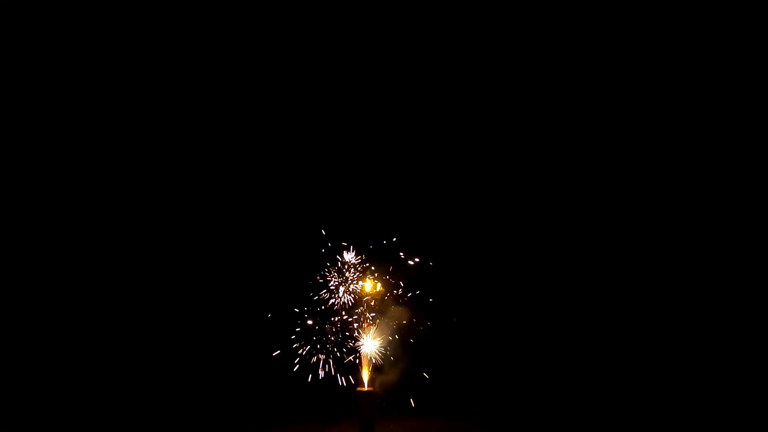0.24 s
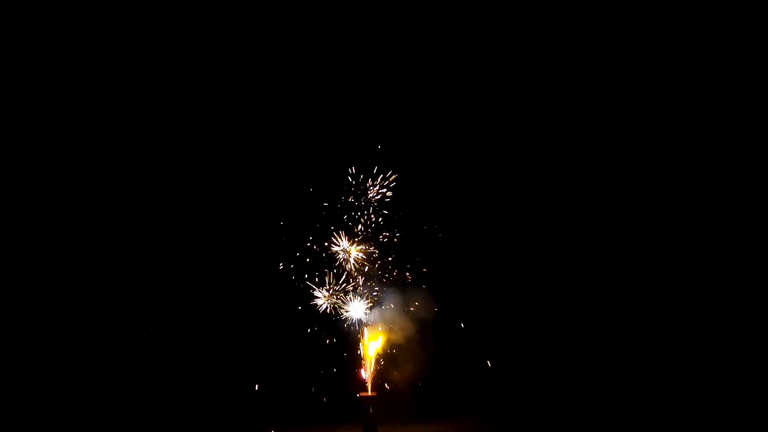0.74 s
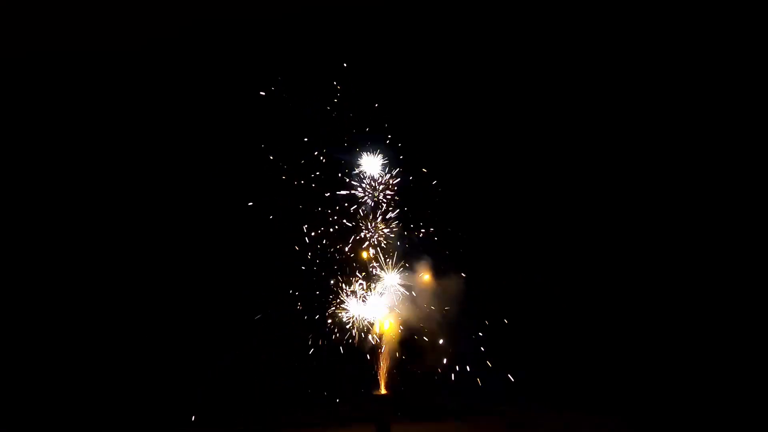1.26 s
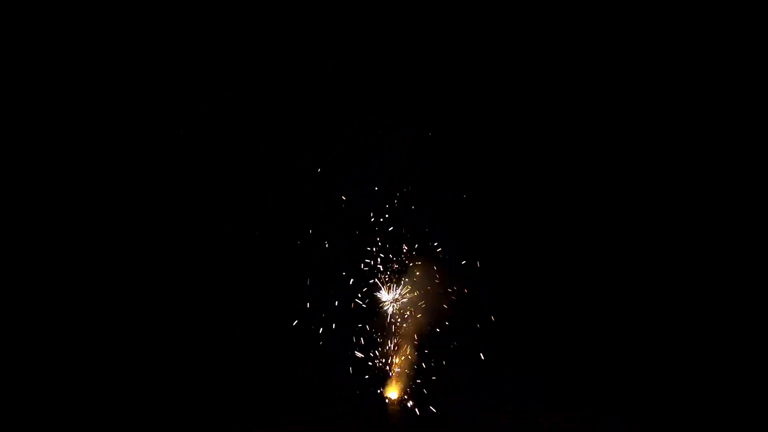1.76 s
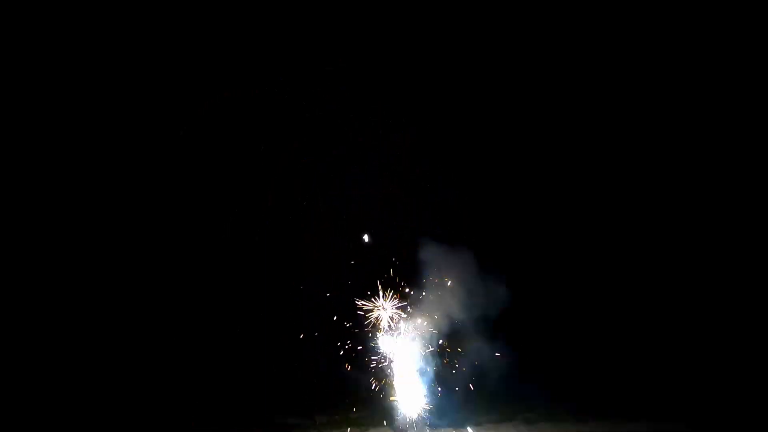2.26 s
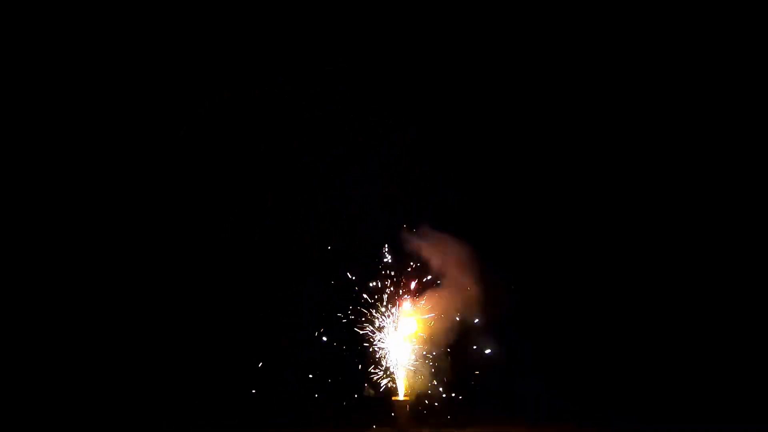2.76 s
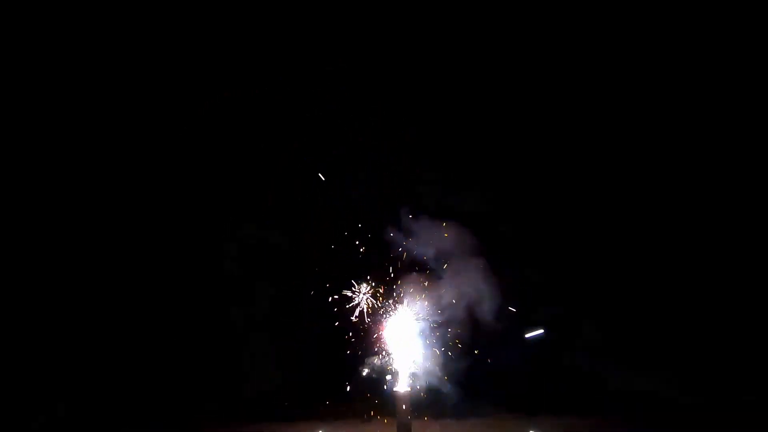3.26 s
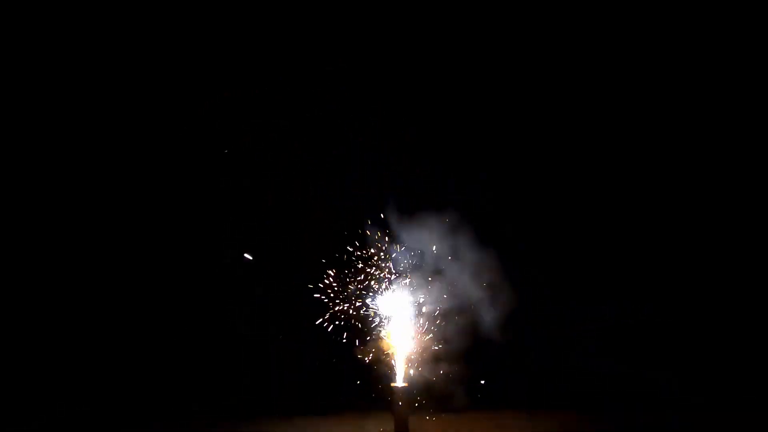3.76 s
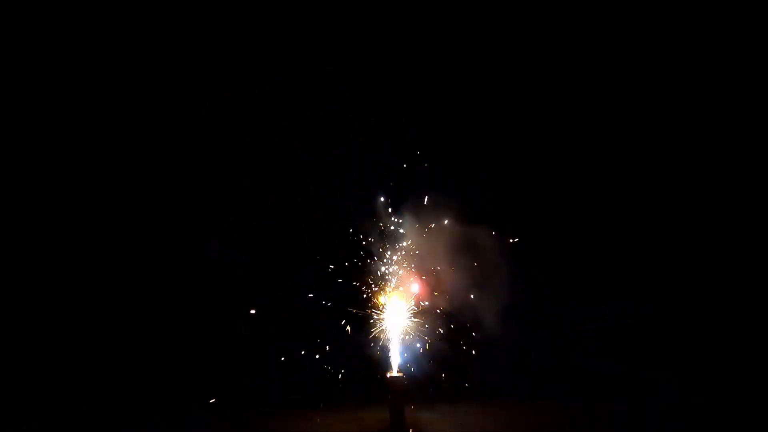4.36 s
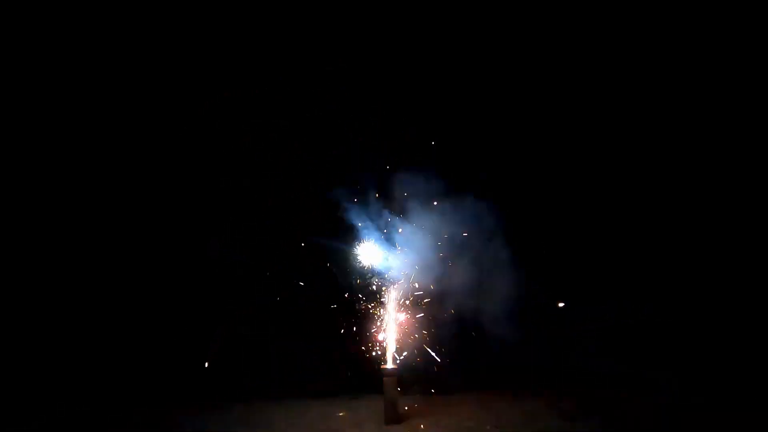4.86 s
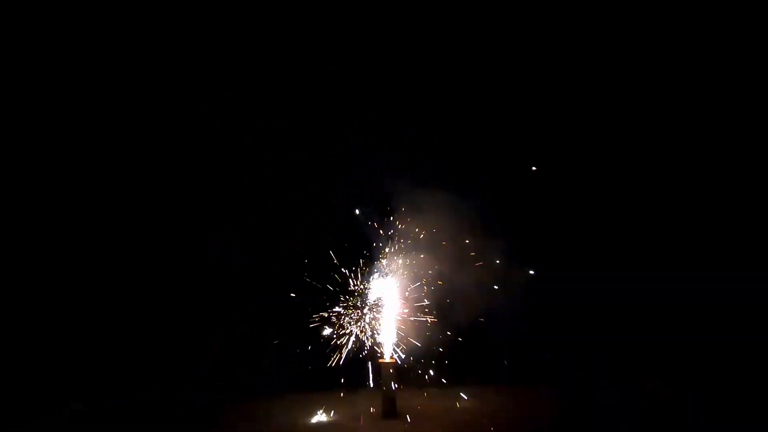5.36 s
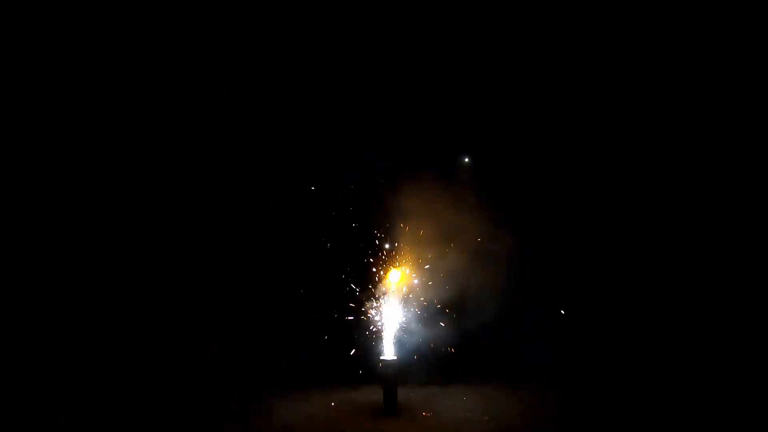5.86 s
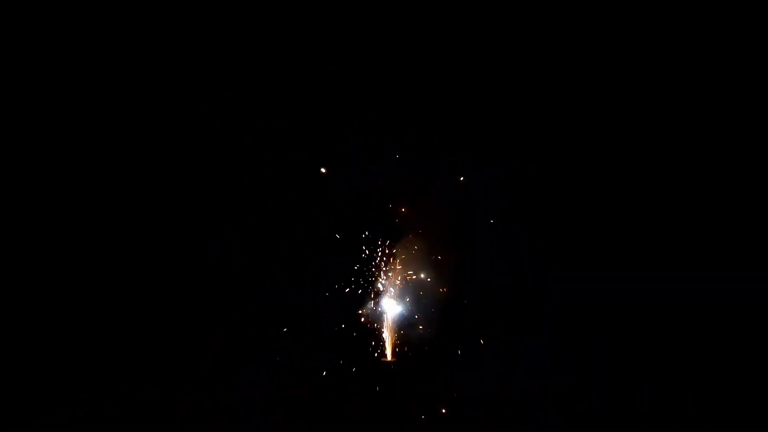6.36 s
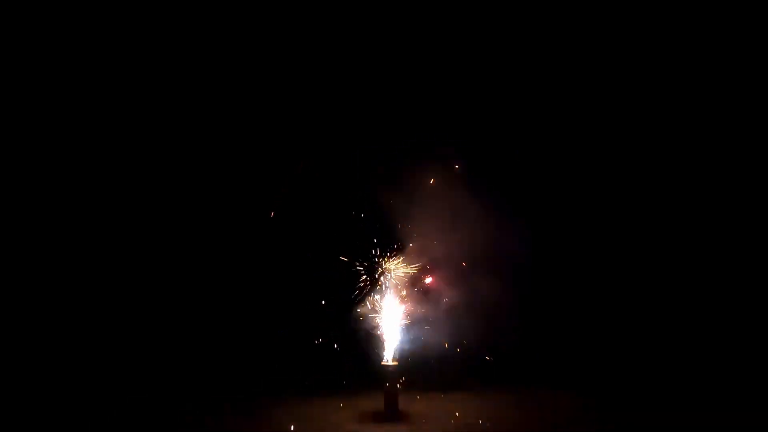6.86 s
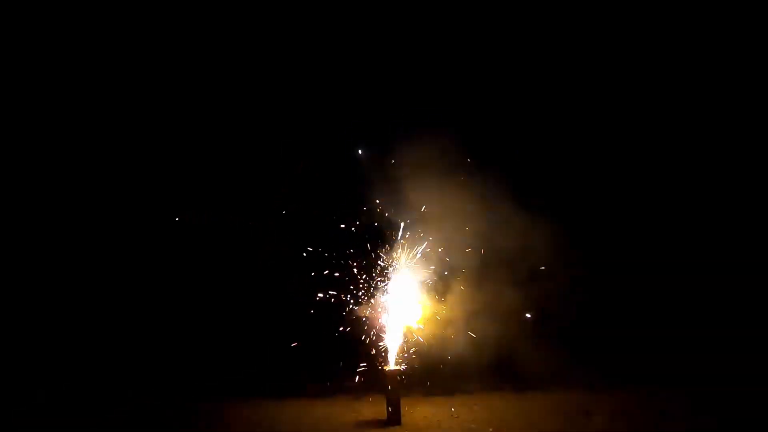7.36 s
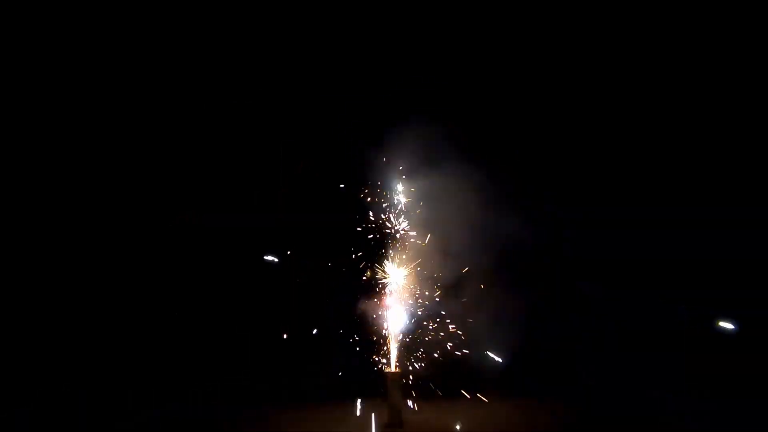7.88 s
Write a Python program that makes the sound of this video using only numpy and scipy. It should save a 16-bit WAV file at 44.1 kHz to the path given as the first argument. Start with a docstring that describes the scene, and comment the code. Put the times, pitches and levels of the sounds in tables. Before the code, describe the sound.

A ground fountain firework is already burning outdoors, a few metres from a small stereo microphone. Throughout, a grainy, fluttering gas hiss and quieter low rumble lie beneath fine spark crackle. From 0 to 2 seconds, sharp pops come in a crowded, irregular stream, many scattering brief sprays of tiny snaps; the fizz swells around 1.4. From about 2.2, stronger cracks with deep thumps are spaced wider, notably near 2.3, 2.8, 3.3, 3.4 and 4.6. Dull hollow tube knocks appear around 2.6, 4.2, 4.7, faintly at 5.8, and 6.9. A tight run of heavy pops fills 5.1 to 5.6, then the jet dips briefly near 5.9. Hard bangs follow around 6.1, 6.8, 7.0, 7.35 and 7.8, with the strongest at 7.95. Each has a millisecond-close ground slap, not a long reverberation; peaks clip and the level ducks briefly. The jet is still burning at the end.

```python
"""A ground fountain firework burns outdoors, a few metres from a small two-port microphone.
From the start its jet fizzes (shaped noise) and rumbles (band noise) under crowded sharp pops: pressure
clicks with a ground echo, a resonant thump and often a spray of spark clicks. Sputters add further sprays.
After about two seconds many pops are stronger and spaced wider; a few also ring the tube with a dull knock.
The last pop is the strongest. Gain control ducks after loud pops, and the highest peaks clip."""
import sys
import numpy as np
from scipy import signal
from scipy.fft import rfft, irfft, next_fast_len
from scipy.io import wavfile

SR = 44100
rng = np.random.default_rng(int(sys.argv[2]) if len(sys.argv) > 2 else 0)


def generate_wav(signal):
    """Clip the signal to [-1, 1] and save it as 16-bit WAV at the path in sys.argv[1]."""
    frames = np.transpose(np.atleast_2d(signal))
    scaled = np.clip(frames, -1, 1) * 32767
    pcm = np.round(scaled).astype(np.int16)
    wavfile.write(sys.argv[1], SR, pcm)


N = 358091


def amp(db):
    """Decibel law: converts a level in dB to a pressure gain."""
    return 10 ** (np.asarray(db) / 20)


def rms_one(x):
    """Normalisation: scales a signal to an rms of 1."""
    return x / np.sqrt(np.mean(x ** 2) + 1e-20)


def one_pole(x, tau_s):
    """Exponential relaxation: a low-pass whose impulse response has unit area."""
    r = np.exp(-1 / (tau_s * SR))
    return signal.lfilter([1 - r], [1, -r], x + 1e-18)


def drift(rate_hz):
    """Random fluctuation: white noise smoothed twice below a rate, with rms 1."""
    tau_s = 1 / (2 * np.pi * rate_hz)
    noise = rng.standard_normal(N + SR)
    smooth = one_pole(one_pole(noise, tau_s), tau_s)
    return rms_one(smooth[SR:])     # the first second lets the filters settle


def colour(x, hz, db):
    """Zero-phase filtering: shapes the spectrum along a curve over log frequency."""
    size = next_fast_len(N + 4096)
    f = np.maximum(np.fft.rfftfreq(size, 1 / SR), 1)
    gain = amp(np.interp(np.log(f), np.log(hz), db))
    return irfft(rfft(x, size) * gain, size)[:N]


def swing(push, ring_hz, width_hz):
    """Damped resonance: a push sets a mode ringing, and a wider mode dies sooner."""
    r, w = np.exp(-np.pi * width_hz / SR), 2 * np.pi * ring_hz / SR
    return signal.lfilter([1, 0, -1], [1, -2 * r * np.cos(w), r * r], push + 1e-18)


# strength of the jet: (time [s], base fizz level [dB])
JET = [(0, -38), (.6, -37), (0.999, -38.5), (1.43, -34.5), (1.62, -39), (2.12, -40), (2.44, -41),
       (2.56, -40), (2.83, -39), (3.47, -41.5), (3.62, -41), (3.8, -40), (4.62, -40.5), (4.78, -39),
       (5.4, -40.5), (5.72, -39), (5.88, -46), (6.15, -38.5), (6.32, -39.5), (6.4, -41), (6.7, -43),
       (6.9, -38), (7.15, -41.5), (8.12, -38.5)]


def jet_level():
    """Source strength: the level of the jet moves linearly in dB between its points."""
    s, fizz = np.transpose(JET)
    return np.interp(np.arange(N) / SR, s, fizz)


RUMBLE_DB = -8.5        # base level of the roar against the fizz
RUMBLE_FOLLOWS = 0.83   # share of the jet's swing in dB


def rumble(fizz_db):
    """Combustion noise: the low roar of the burning charge is band noise that flutters in level."""
    mean_db = fizz_db.mean()
    rumble_db = mean_db + RUMBLE_FOLLOWS * (fizz_db - mean_db) + RUMBLE_DB
    band = signal.butter(3, [50.0, 230.0], "band", fs=SR, output="sos")
    shared = signal.sosfilt(band, rng.standard_normal(N))
    own = signal.sosfilt(band, rng.standard_normal(N))
    roar = rms_one(shared + 0.09 * own * [[1], [-1]])    # nearly the same in both ports
    return roar * amp(rumble_db + 3.1 * drift(46.0))


TREBLE_FOLLOWS = 1               # share of the jet's swing in dB
SURGE_HZ, SURGE_DB = 4400, 3.5   # the gas sputters mostly below this pitch; scale of its level swings
# spectrum of the gas hiss before scaling: (frequency [Hz], relative level [dB])
HISS = [(300, -33), (478, -10), (801, -2), (1930, 3), (3830, 1.5), (8790, 1.5), (14000, -28), (16000, -42)]


def hiss(fizz_db):
    """Turbulent jet noise: gas rushing from the nozzle, scattered back unrelated in the two ports."""
    hz, db = np.transpose(HISS)
    noise = [rms_one(colour(rng.standard_normal(N), hz, db)) for _ in range(2)]
    low = signal.sosfilt(signal.butter(2, SURGE_HZ, fs=SR, output="sos"), noise)
    treble = noise - low
    calm_db = fizz_db.mean() + TREBLE_FOLLOWS * (fizz_db - fizz_db.mean())
    flutter = drift(34.0) + 0.46 * drift(8.2)
    return amp(fizz_db + SURGE_DB * flutter) * low + amp(calm_db) * treble


TUBE_HZ, TUBE_WIDTH_HZ = 700, 110
# dull bursts inside the tube: (time [s], push level before the port offsets [dB])
KNOCKS = [(2.622, -20), (4.194, -20), (4.7052, -23), (5.8256, -30.5), (6.9183, -23.5)]


def knocks():
    """Tube resonance: a dull burst at the nozzle sets the tube ringing briefly."""
    s, db = np.transpose(KNOCKS)
    push = np.bincount(np.round(s * SR).astype(int), amp(db), N)
    return -swing(push, TUBE_HZ, TUBE_WIDTH_HZ) * amp([[-2.0], [1.5]])


ECHO_FADES_FROM_MS, ECHO_LOSS_DB = 1.79, 2   # later echoes weaken by this many dB per ms
# ground echo, the right port facing the ground: (left level [dB], right level [dB])
GROUND_DB = (0, 3.5)
# dull echo off a surface near the microphone: (delay [ms], left level [dB], right level [dB])
NEAR_ECHO = (1.629, -13, -9)


def with_ground(at, size, echo_ms, open_air=1):
    """Image source: each pressure click reaches both ports directly, off the ground and off a near surface."""
    late = np.minimum(at + np.round(echo_ms * SR / 1000).astype(int), N - 1)
    direct = np.bincount(at, size, N)
    # high bursts meet the ground steeply and come back weaker and duller
    steep = np.clip(echo_ms - ECHO_FADES_FROM_MS, 0, 1)
    loss_db = ECHO_LOSS_DB * np.maximum(echo_ms - ECHO_FADES_FROM_MS, 0)
    back = open_air * size * amp(-loss_db)
    echo = one_pole(np.bincount(late, back * (1 - steep), N), .00004)
    echo = echo + one_pole(np.bincount(late, back * steep, N), .00008)
    near_ms, *near_db = NEAR_ECHO
    dull = one_pole(direct, 0.000059)
    near = np.interp(np.arange(N) - near_ms * SR / 1000, np.arange(N), dull, left=0)
    return -(direct + echo * amp(GROUND_DB)[:, None] + near * amp(near_db)[:, None])


JET_SPARKS_DB = -7.5                      # base level of the jet's sparks against its fizz
SNAP_GAIN, CROSSOVER_HZ = 1.253, 377      # gain of sparks against star fronts; their low cut
MID_SNAPS_PER_S, MID_SNAP_DB = 27, 11     # occasional louder sparks: click size before the spark level
# puffs of sparks without a loud crack: (time [s], spray level before the spark and port gains [dB])
SPUTTERS = [(0.125, -29.5), (0.1579, -33.5), (0.332, -31.5), (0.3624, -35.5), (0.393, -34), (0.4054, -44),
            (0.43, -31), (0.471, -30), (0.513, -39), (0.5575, -38), (0.611, -29), (0.658, -36), (0.74, -37),
            (0.756, -37), (0.7937, -33), (0.941, -30), (0.98, -33), (0.993, -37), (1.047, -36),
            (1.119, -33), (1.163, -34.5), (1.245, -31), (1.5086, -39), (1.5195, -33), (1.623, -33),
            (1.688, -33), (1.721, -31), (1.878, -35), (1.997, -34.5), (2.012, -30), (2.026, -33),
            (2.044, -31.5), (2.113, -33), (2.176, -32), (2.208, -31), (2.3842, -37.5), (2.484, -38),
            (2.548, -37.5), (2.6327, -37), (2.668, -37), (2.993, -34.5), (3.295, -33.5), (3.457, -37),
            (3.604, -36), (3.636, -34.5), (3.817, -41.5), (4.101, -35.5), (4.1257, -42), (4.374, -34.5),
            (4.42, -31.5), (4.515, -33.5), (4.7217, -37), (4.736, -35), (4.755, -37), (4.778, -33.5),
            (4.859, -40), (4.897, -34.5), (4.912, -39), (5.0748, -42), (5.682, -36.5), (5.7162, -35),
            (5.77, -38.5), (5.858, -40), (5.939, -38.5), (6.037, -37), (6.246, -39), (7.393, -38)]


def sparks(fizz_db, per_s, spread_db, spray_s, clump_db):
    """Shot noise: tiny sparks snap at random, in the jet and in a dying spray after bursts and sputters."""
    s, spray_db = np.vstack([np.array(POPS)[:, [0, 4]], SPUTTERS]).T
    kicks = np.bincount(np.round(s * SR).astype(int), amp(spray_db), N)
    fade = np.exp(-(np.arange(SR // 20) / (spray_s * SR)) ** 2)     # a spray holds, then dies fast
    spray = np.convolve(kicks, fade)[:N]
    jet = amp(fizz_db + JET_SPARKS_DB + clump_db * drift(29.0))
    level = np.hypot(jet, spray)

    draw = rng.random((N, 3))     # chance of a spark, its size, its height
    opens = np.round(np.array(SPUTTERS)[:, 0] * SR).astype(int)
    draw[opens, 0] = 0            # a spark is certain where a sputter opens
    at = np.flatnonzero(draw[:, 0] < per_s / SR)
    size = amp(spread_db * np.minimum(-np.log(draw[at, 1]), 5))
    size = size / np.sqrt(np.mean(size ** 2) * per_s / SR)     # the stream of clicks has rms near 1
    size[draw[at, 0] < MID_SNAPS_PER_S / SR] = amp(MID_SNAP_DB)
    size[np.searchsorted(at, opens)] = 6.8     # each sputter opens with a distinct snap

    echo_ms = 1.5 + 1.2 * draw[at, 2] ** 3.0      # most burn low, near the nozzle
    grains = with_ground(at, size * level[at], echo_ms)
    grains = SNAP_GAIN * signal.lfilter([1, -.4], [1], grains)      # small charges snap brighter
    return signal.sosfilt(signal.butter(2, CROSSOVER_HZ, "high", fs=SR, output="sos"), grains)


RISE_S, SINK_DB = 0.0022, 3   # the rise leads by this time; the fall is pushed harder by this much
DEEP_GROWTH = 3.07            # dB of deep push per dB of thump
LIGHT_BELOW_DB, HIGH_FROM_MS, LIGHT_HZ = -30, 2.9, 230   # light thumps and high bursts ring higher
# the left port passes less deep bass: one gain per row, left then right
DEEP_SIDES = np.array([[.45], [1.4]])


def thumps(lag_ms, deep_from_db):
    """Impulse response: the low end of a burst rises, then sinks with the ground echo; heavy ones ring deeper."""
    s, _, echo_ms, thump_db, _ = np.transpose(POPS)
    at = np.round((s + lag_ms / 1000) * SR).astype(int)
    early = np.maximum(at - round(RISE_S * SR), 0)
    late = at + np.round(echo_ms * SR / 1000).astype(int)
    light = 1 / (1 + amp(2 * (thump_db - LIGHT_BELOW_DB)))
    light = np.maximum(light, np.clip(echo_ms - HIGH_FROM_MS, 0, 1))

    def push(share):
        """Paired impulses: an upward push, then a stronger downward one."""
        rise = np.bincount(early, share * amp(thump_db), N)
        fall = np.bincount(late, share * amp(thump_db + SINK_DB), N)[:N]
        return rise - fall

    high = swing(push(light), LIGHT_HZ, width_hz=122.0)
    low = swing(push(1 - light), ring_hz=170.0, width_hz=127.0)
    deep = -np.bincount(at, amp(DEEP_GROWTH * (thump_db - deep_from_db)), N)[:N]
    both = (low + high) * amp([[-1.5], [1.5]])
    both = both + swing(deep, ring_hz=48.0, width_hz=47.0) * DEEP_SIDES
    return signal.sosfilt(signal.butter(4, 340.0, fs=SR, output="sos"), both)


HEAVY_FROM_DB, HEAVY_SPAN_DB = -25.5, 1   # thump less half the crack level: where fronts broaden
# bursting stars, levels before the later gains: (time [s], crack level [dB], ground echo delay [ms],
# thump push level [dB], spray level [dB])
POPS = [(0.0019, -13, 2.1, -36, -30), (0.0575, -3, 1.96, -29, -49), (0.082, 0, 2.63, -22, -27),
        (0.1952, -11, 2.4, -36, -28.5), (0.217, -4.5, 1.6, -45, -59), (0.2582, -5, 2.5, -34, -34),
        (0.2683, -5, 4.2, -47, -33), (0.2838, -5, 2.4, -26.5, -28.5), (0.3148, -5, 2.1, -25.5, -31),
        (0.4022, -7.5, 3.9, -28, -29), (0.4427, -6, 2.7, -29, -26.5), (0.4532, -5.5, 2.7, -28, -31),
        (0.4966, 0.5, 3, -23.5, -31), (0.5426, -4, 2.55, -31, -46), (0.6303, -3, 2.5, -42, -33),
        (0.6395, -9, 3.7, -27, -29), (0.6665, -4, 4.5, -30, -27.5), (0.6992, -5.5, 3.9, -27, -28),
        (0.7223, -7, 4.8, -27, -30), (0.832, -5.5, 5.9, -29, -28.5), (0.8592, -5, 2.9, -29, -31),
        (0.875, -5, 1.8, -45, -32), (0.8962, -2.5, 2.9, -24.5, -32), (0.9176, -8, 3.6, -48, -36),
        (0.9452, -9, 3.9, -26.5, -28), (0.9524, 2, 3.1, -24.5, -49), (1.001, -8, 4.9, -26, -39),
        (1.0613, -4, 2.4, -50, -55), (1.091, -0.5, 2.5, -25.5, -49), (1.1665, -10.5, 2.6, -33, -44),
        (1.1937, -7, 1.63, -23.5, -26), (1.2112, -4, 3, -29, -28), (1.2473, -3, 3.8, -27, -54),
        (1.2749, -2.5, 4.2, -23.5, -43), (1.3019, -0.5, 2.49, -27, -49), (1.3175, -2, 3.7, -23.5, -25),
        (1.3387, -8.5, 2.7, -27, -32), (1.3781, -10.5, 3, -35, -36), (1.3883, -3.5, 1.6, -29.5, -27.5),
        (1.4775, -8, 2.4, -34, -29.5), (1.551, -6, 2.6, -32, -31), (1.564, -13, 3.8, -27, -23.5),
        (1.5759, -4.5, 1.9, -25, -32), (1.6515, -5, 2.8, -28.5, -45), (1.6709, -3, 3.2, -29, -31),
        (1.701, -7.5, 2.13, -28.5, -35), (1.7286, -4.5, 1.7, -29, -32), (1.7756, -4, 3.3, -28, -34),
        (1.8209, -13, 2.6, -32, -27.5), (1.915, -8, 2.8, -40, -31), (1.9452, -4, 2.23, -32, -31),
        (2.0556, -6, 2.4, -35, -49), (2.143, -3.5, 2.56, -25.5, -34), (2.1834, 0, 2.36, -24, -30),
        (2.231, -10, 2.2, -30.5, -35), (2.2875, 4.5, 1.65, -16.5, -29), (2.3433, -12.5, 2.8, -38, -50),
        (2.405, 3, 1.04, -15.5, -58), (2.5574, -11, 2.4, -51, -35), (2.622, -4.5, 0.97, -20, -54),
        (2.646, -4, 2.6, -30.5, -36), (2.6553, -4, 2.4, -28, -49), (2.706, -10.5, 2.6, -30.5, -38),
        (2.7734, 1, 1.38, -21, -42), (2.7786, 6.5, 1.21, -14.5, -57), (3.025, 2.5, 1.39, -22.5, -58),
        (3.0792, -7, 2.8, -27.5, -29), (3.155, -7, 2.6, -27, -32.5), (3.163, 3, 1.38, -18.5, -58),
        (3.2427, -5.5, 3.1, -24.5, -29), (3.3133, -8, 3, -41, -32), (3.3176, 5.5, 1.36, -14.5, -50),
        (3.4294, 6.5, 3.1, -14, -27), (3.6537, -10.5, 2.5, -41, -42), (3.6939, -6.5, 3.4, -33, -30.5),
        (3.7657, 1, 1.45, -21.5, -59), (3.9158, 2.5, 2.4, -22, -53), (4.01, -13.5, 2.4, -40, -38),
        (4.046, -12.5, 2.6, -45, -32), (4.0655, -6.5, 2.5, -56, -54), (4.1506, -4, 3.7, -34, -32),
        (4.194, -1, 3.9, -18.5, -36), (4.2075, -11, 5.5, -23, -26.5), (4.2108, -2.5, 1.5, -50, -52),
        (4.245, -16, 2.6, -36, -33), (4.2948, -1.5, 2.33, -24, -29), (4.4924, -3.5, 2.1, -25.5, -39),
        (4.5536, -3, 3.2, -27, -36), (4.576, 7.5, 2.86, -14.5, -30), (4.7058, -7, 1.5, -28, -34.5),
        (4.8026, -4.5, 2.9, -24.5, -38), (4.8459, -5.5, 2.6, -31, -31.5), (4.975, 4.5, 2.15, -26, -70),
        (5.002, -9, 3.5, -29, -37.5), (5.125, -7, 1.45, -35, -34), (5.142, -6, 1.3, -33, -31),
        (5.1668, 6.5, 1.58, -15.5, -37), (5.2053, 2.5, 2.55, -16, -31), (5.2937, 2.5, 1.83, -17, -34),
        (5.3706, -2.5, 2, -26, -42), (5.4178, 1.5, 1.97, -16.5, -35), (5.4795, 1, 1.95, -16, -34),
        (5.5585, -2.5, 2, -26, -53), (5.596, -2.5, 1.95, -23.5, -53), (5.614, -5, 2.4, -28, -39),
        (5.7436, -9, 2.9, -35, -32.5), (5.8259, -12.5, 1, -32, -54), (6.0489, -8.5, 3.4, -40, -30),
        (6.1096, 7.5, 2.22, -16, -37), (6.2605, -5, 1.8, -28, -29), (6.2729, 4, 2.1, -17.5, -49),
        (6.4302, -10, 2.4, -49, -39), (6.525, -5, 1.94, -32, -34), (6.58, -6.5, 1.56, -31, -35),
        (6.6172, -21, 1.3, -34, -42), (6.7214, -7.5, 1.4, -52, -54), (6.8014, 5, 2.17, -20, -30),
        (6.9184, -9.5, 0.76, -28, -41), (6.966, -1.5, 1.57, -30, -28.5), (7.0364, 5, 2.59, -15, -31),
        (7.2094, -11.5, 2.2, -48, -34), (7.2912, -11.5, 3.1, -51, -59), (7.3483, 8, 2.6, -14.5, -30),
        (7.3707, -2.5, 2.1, -24, -33), (7.4713, 0, 2.5, -20.5, -32), (7.5374, -2, 1.76, -19.5, -36),
        (7.5925, -7, 2.04, -28.5, -31.5), (7.653, -4.5, 1.37, -28, -44), (7.7727, 8, 2.9, -14.5, -33),
        (7.9341, -5, 1.7, -28, -32), (7.949, 9.5, 3.1, -14, -33)]


def cracks(broad_s, debris_db, debris_s):
    """Blast wave: a burst sends a sharp front, broader for heavy charges, with a ragged tail of debris."""
    s, crack_db, echo_ms, thump_db, _ = np.transpose(POPS)
    at, size = np.round(s * SR).astype(int), amp(crack_db)
    heavy = np.clip((thump_db - .5 * crack_db - HEAVY_FROM_DB) / HEAVY_SPAN_DB, 0, 1)
    # the tube hides the ground from a burst that falls on a knock
    open_air = np.abs(s[:, None] - np.array(KNOCKS)[:, 0]).min(1) > .003
    sharp = with_ground(at, size * (1 - heavy), echo_ms, open_air)
    broad = np.hanning(2 * round(broad_s * SR / 2) + 1)
    wide = with_ground(at, size * heavy, echo_ms, open_air)
    wide = np.array([np.convolve(v, 1.265 * broad / broad.sum(), "same") for v in wide])
    ragged = one_pole(np.bincount(at, size, N), debris_s) * debris_s * SR     # starts at the crack size
    debris = amp(debris_db) * ragged * rng.standard_normal((2, N))
    return sharp + wide + debris


PORT_GAIN_DB = 11.5   # sensitivity of the ports to sharp fronts
# microphone colour: (frequency [Hz], left gain [dB], right gain [dB])
PORTS = [(250, -18, -17), (392, -10.5, -10.5), (643, -1, 0), (900, -7, -0.5), (2400, -0.5, -0.5),
         (3250, 2.5, 1.5), (4990, -5.5, -3), (7600, -9, -2.5), (8990, -6.5, -7.5), (10500, -43, -9.5),
         (12960, -17.5, -28), (14630, -40, -23), (16600, -66, -64)]
# bounce off the housing, a row for left and right: (delay [ms], level [dB])
HOUSING = [(0.178, -18), (0.268, -27.5)]


def ports(x):
    """Diffraction and cavity resonance: each port has its colour and a housing bounce; a cavity rings."""
    hz, *dbs = np.transpose(PORTS)
    out = []
    for v, db, (ms, bounce_db) in zip(x, dbs, HOUSING):
        bounce = np.interp(np.arange(N) - ms * SR / 1000, np.arange(N), v)
        out.append(colour(v + amp(bounce_db) * bounce, hz, db))
    ring = swing(x[0], ring_hz=9200.0, width_hz=510.0)
    cavity = amp(-34.0) * ring * [[1], [-1]]     # rings in opposite sense in the two ports
    return amp(PORT_GAIN_DB) * (np.array(out) + cavity)


def scene():
    """Superposition: the pressures of bursts, sparks, knocks and jet add."""
    fizz_db = jet_level()
    snaps = cracks(broad_s=.00014, debris_db=-20.5, debris_s=0.0027)
    snaps = snaps + sparks(fizz_db, per_s=4000.0, spread_db=4.0, spray_s=0.012, clump_db=2.5)
    lows = thumps(lag_ms=0.98, deep_from_db=-12.0) + rumble(fizz_db)
    return ports(snaps) + lows + knocks() + hiss(fizz_db)


CUTOFF_HZ = 16400


def record(dry):
    """Compression and clipping: gain ducks after loud peaks and recovers; peaks clip; the top is cut."""
    level_db = 20 * np.log10(np.abs(dry).max(0) + 1e-6)
    slope = 319.0 * np.arange(N) / SR                  # release of the held peak, dB a second
    held_db = np.maximum.accumulate(level_db + slope) - slope
    duck_db = one_pole(0.51 * np.maximum(held_db + 14.0, 0), 0.0018)
    clipped = np.clip(dry * amp(-duck_db), -1, 1)
    cut = signal.cheby2(16, 80, CUTOFF_HZ, fs=SR, output="sos")
    return signal.sosfilt(cut, clipped)


dry = scene()
out = record(dry)
generate_wav(out)
```